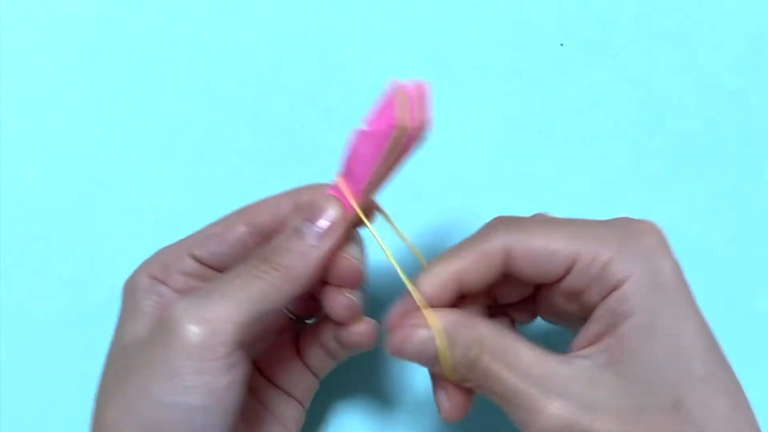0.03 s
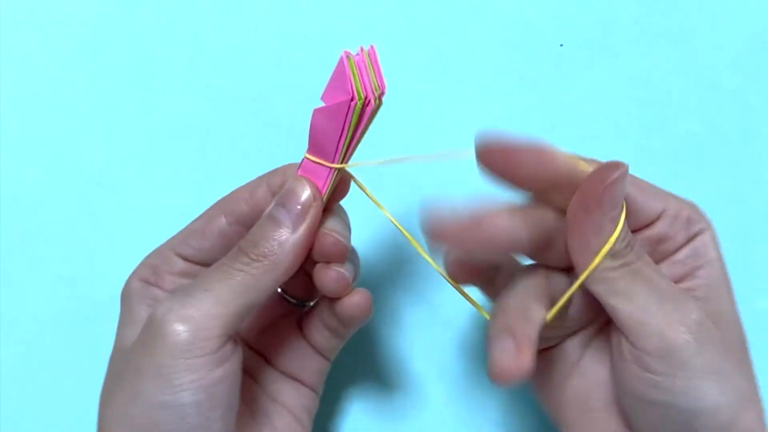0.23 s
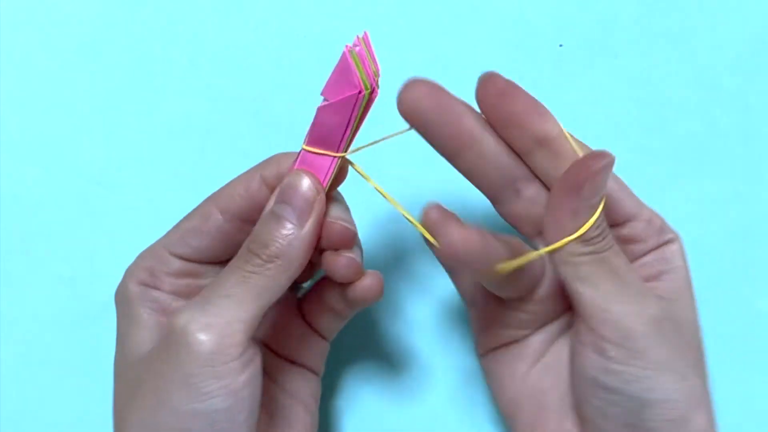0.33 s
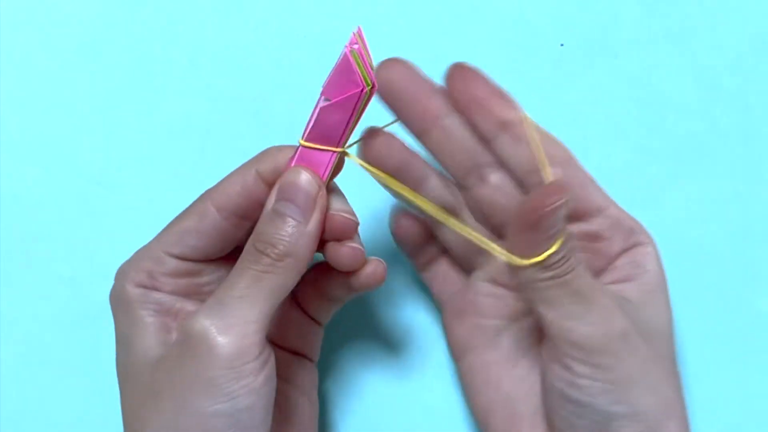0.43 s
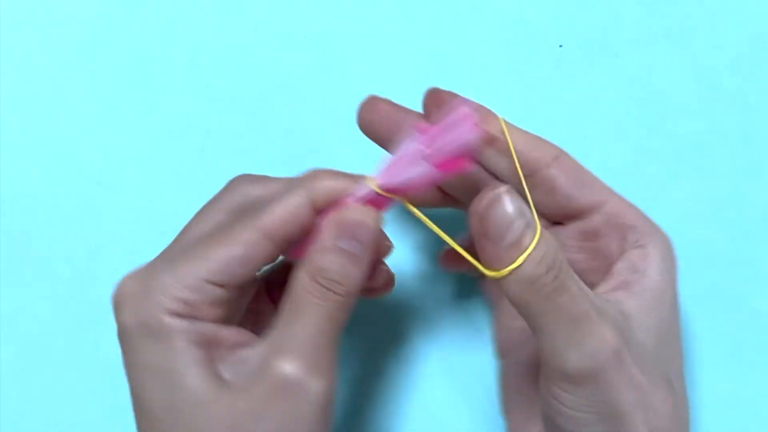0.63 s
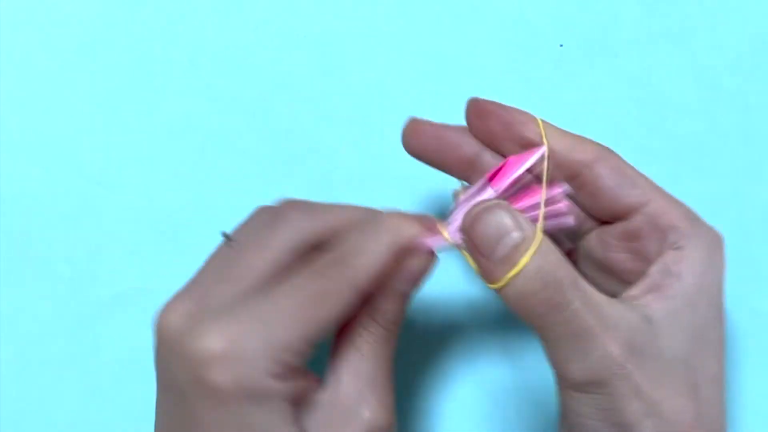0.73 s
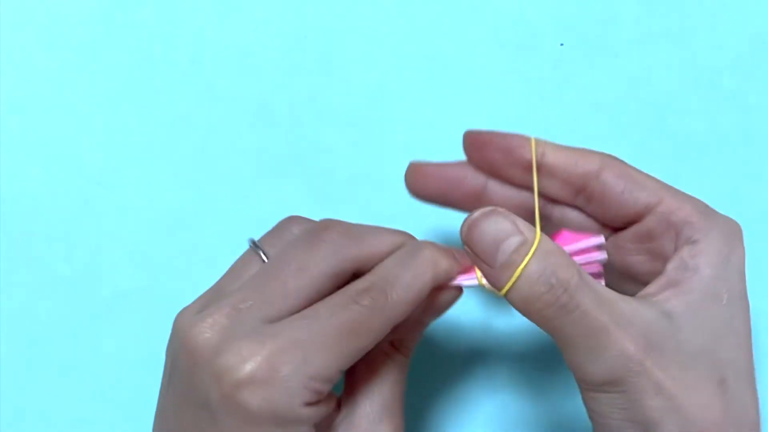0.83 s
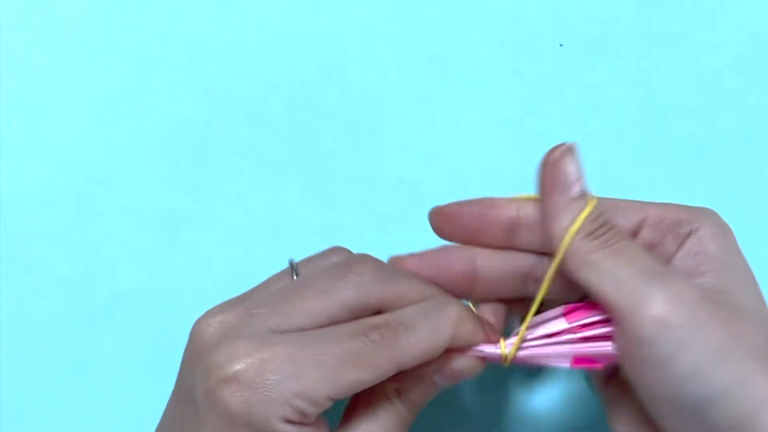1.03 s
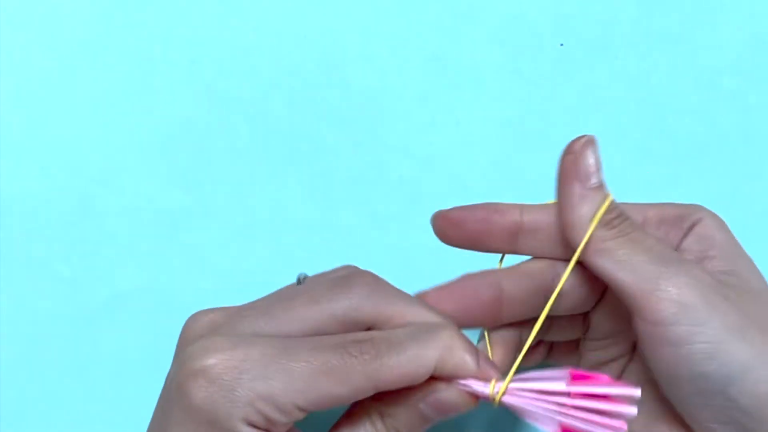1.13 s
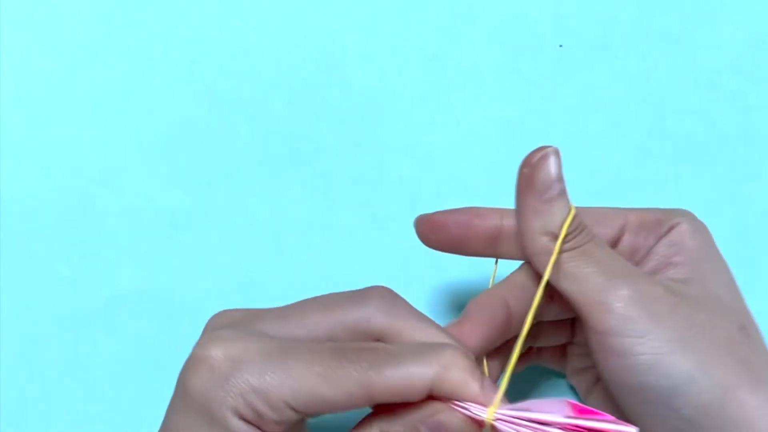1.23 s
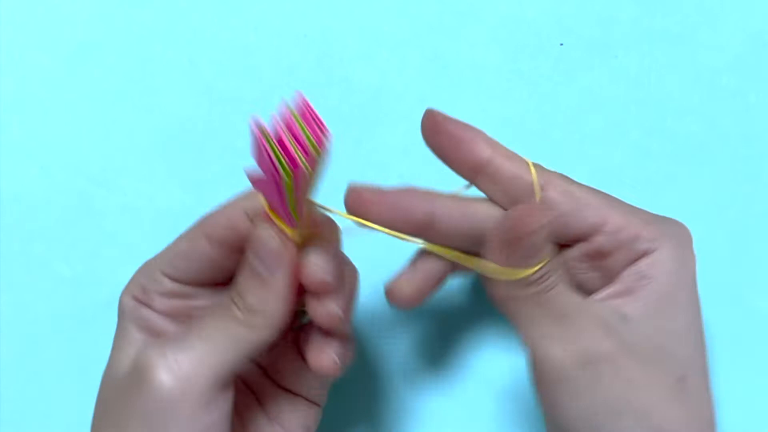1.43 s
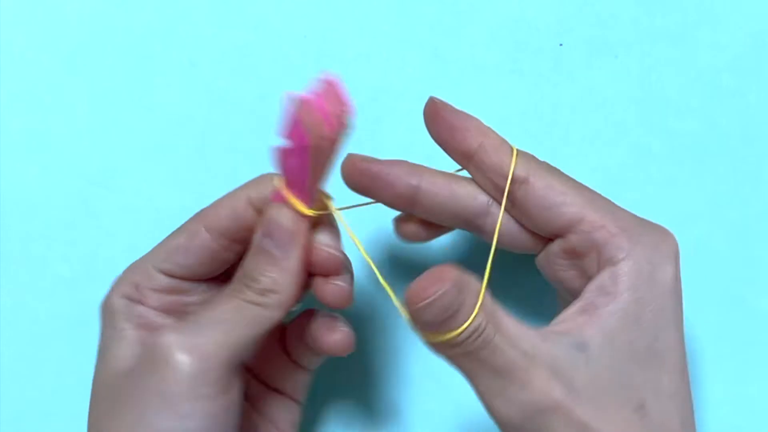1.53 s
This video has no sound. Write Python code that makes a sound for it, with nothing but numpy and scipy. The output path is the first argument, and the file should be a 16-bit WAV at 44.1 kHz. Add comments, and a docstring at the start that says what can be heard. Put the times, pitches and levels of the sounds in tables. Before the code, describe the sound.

A rubber band is wound around folded paper, close up in a small quiet room. Light finger taps and faint rustling come first, with a low flutter at 0.2 seconds. The band twangs off a finger at 0.45, then snaps sharply on the pleats several times around 0.7. A short crackly scrape ends in two clicks near 1.05, followed by faint ticks and soft hand rumble until 1.6.

```python
"""First come light finger taps and rustling paper, as a rubber band is wound around a folded paper fan.
The band flutters, is plucked off a finger, snaps sharply over the pleats and then scrapes along an edge.
Each snap makes the paper crack and ring; the scrape is thousands of tiny slips of rubber on paper.
The hands rumble softly. It all happens close to the microphone in a small quiet room."""
import sys
import numpy as np
from scipy import signal
from scipy.fft import rfft, irfft
from scipy.io import wavfile

SR = 44100
rng = np.random.default_rng(int(sys.argv[2]) if len(sys.argv) > 2 else 0)


def unload_audio(sound):
    """Save the sound as a 16-bit wav file, at the path given as the first command line argument."""
    columns = np.transpose(np.atleast_2d(sound))
    # keep every value between -1 and 1, then stretch to whole-number steps
    steps = np.round(np.clip(columns, -1, 1) * 32767)
    wavfile.write(sys.argv[1], SR, steps.astype(np.int16))


N = 70560

# The band hitting the pleats. Each row: start in seconds, level in dB, decay in seconds, edge pitch in Hz,
# then the dB added for each part: body knock, edge ring, edge buzz, crack, thump.
SNAPS = [(0.6827, -45.5, 0.009, 5200, -3.5, -11, 0.5, -5, -20.5),
         (0.6922, -23.5, 0.0019, 5280, -1.5, 0, 0.5, 0, -29.5),
         (0.7117, -21.5, 0.0022, 5050, 2.5, -4.5, 1.5, -8, -24),
         (0.7365, -35.5, 0.0032, 5200, -11.5, -9, -7, -6, -8.5),
         (0.7407, -20.5, 0.002, 5600, 0.5, -15.5, 0, 7.5, -9)]


def snaps():
    """The band hits a pleat with a crack and a thump; the fan knocks and its edge rings and buzzes."""
    # How the folded paper rings. Each row: pitch in Hz, width in Hz, level in dB.
    body_modes = [(565, 140, 4.5), (818, 66, 0.5), (1276, 260, 14.5), (1497, 160, 6)]
    # How its stiff edge rings. Each row: multiple of the edge pitch, width in Hz, level in dB.
    edge_modes = [(0.741, 380, -3), (.94, 380, -2), (0.999, 280, 5), (1.39, 600, -3.5)]
    # The tone of the buzz, crack and thump. Each row: frequency in Hz, level in dB.
    buzz_tone = [(300, -15), (1800, -14.5), (2500, -1.5), (3800, 5), (5200, -1.5), (6200, -12.5), (7500, 7),
                 (9500, 7.5), (11000, 5), (12500, 3), (16000, -4.5)]
    crack_tone = [(1000, -26), (6200, -12.5), (7500, 0), (9500, -1.5), (11500, -4.5), (13500, -2),
                  (15300, 1.5), (16500, -17)]
    thump_tone = [(60, -15), (130, -11.5), (250, 3), (400, -5), (650, -17.5), (820, 10), (1000, -2),
                  (3000, -30.5)]
    rise_s, body_lag_s = 0.00069, 0.00045
    out = np.zeros(N)
    for start, db, decay, edge_hz, *part_levels in SNAPS:
        modes = [(multiple * edge_hz, width, mode_db) for multiple, width, mode_db in edge_modes]
        push = burst(start + body_lag_s, decay / 2)
        knock = ring(push, body_modes)
        edge = ring(burst(start, decay / 2, rise_s), modes)
        buzz = colour(burst(start, decay, rise_s), buzz_tone)
        crack = colour(burst(start, decay=0.00034, rise=rise_s), crack_tone)
        thump = colour(push, thump_tone)
        for part_db, layer in zip(part_levels, (knock, edge, buzz, crack, thump)):
            out += sized(layer, db + part_db, decay)
    return out


def snap_spread():
    """What each snap throws out into the room, broader in tone than what faces the microphone."""
    # The tone sent into the room. Each row: frequency in Hz, level in dB.
    tone = [(100, -9.5), (250, 7.5), (700, -7), (1400, 7), (2500, 5), (4500, 1), (6200, 0), (9000, -2.5),
            (12000, -1.5), (16000, -12)]
    boost_db = 5
    return sum(sized(colour(burst(start, decay), tone), db + boost_db, decay)
               for start, db, decay, *_ in SNAPS)


def pluck(start=0.4435):
    """The loop slaps a finger and its two sides shudder; the high overtones die first."""
    # The two sides of the loop. Each row: pitch in Hz, stiffness, level in dB, decay in seconds,
    # change in overtone level in dB per octave.
    strands = [(69.4, 0.00014, -29, .06, -7.5), (40.69, .00004, -40, 0.062, 0)]
    # The tone of the loop. Each row: frequency in Hz, dB added to an overtone there.
    tone = [(40, -19.5), (68, -6), (137, 8), (175, -4.5), (215, 0), (290, -0.5), (350, -3.5), (410, 0),
            (520, -3), (750, -0.5), (1000, -4.5), (1400, -6), (1750, -13.5), (2100, -34.5)]
    sag, settle_s, rise_s = 0.031, 0.027, 0.003
    waver_depth, loss_per_khz, uneven_db = 0.0297, 5.7, 2.5
    age = np.maximum(clock() - start, 0)
    glide = (age > 0) * (1 - sag * np.exp(-age / settle_s))  # starts a little low in pitch
    out = np.zeros(N)
    for pitch, stiffness, db, decay, tilt_db in strands:
        for k, (first_turn, uneven) in enumerate(rng.standard_normal((48, 2)), 1):
            hz = k * pitch * np.sqrt(1 + stiffness * k ** 2)
            waver = 1 + waver_depth * wander(step_s=0.025)
            turns = np.cumsum(hz * glide * waver) / SR + first_turn
            loss = 1 / decay + loss_per_khz * hz / 1000
            gain = undb(db + at(hz, tone) + tilt_db * np.log2(k) + uneven_db * uneven)
            out += gain * np.exp(-age * loss) * np.sin(2 * np.pi * turns)
    return out * (1 - np.exp(-age / rise_s)) + slap(start)


def slap(start):
    """The strand lands on the finger: a dull smack and a very short note that falls in pitch."""
    # The tone of the smack. Each row: frequency in Hz, level in dB.
    tone = [(80, -16.5), (200, 0), (350, -7), (520, -1.5), (700, -7.5), (1000, -5.5), (1700, -14.5),
            (2300, -27), (5000, -40), (9000, -65)]
    note_hz, fall_s, note_s, smack_s = 590.4, 0.027, 0.0071, 0.0099
    age = np.maximum(clock() - start, 0)
    turns = note_hz * fall_s * (1 - np.exp(-age / fall_s))
    swell = np.sqrt(age / note_s) * np.exp(-(age / note_s) ** 2)
    smack = sized(colour(burst(start, smack_s), tone), db=-23.5, decay=smack_s)
    return smack + undb(-14.5) * swell * np.sin(2 * np.pi * turns)


def flutter(start=0.2115):
    """The slack strand swings slowly, starting high in pitch with a brief note an octave above."""
    pitch_hz, overshoot, settle_s = 51.44, 0.39, 0.018
    decay_s, octave_decay_s = 0.18, 0.024
    age = np.maximum(clock() - start, 0)
    hz = (age > 0) * pitch_hz * (1 + overshoot * np.exp(-age / settle_s))
    phase = 2 * np.pi * np.cumsum(hz) / SR
    low_note = np.exp(-age / decay_s) * np.sin(phase)
    octave = np.exp(-age / octave_decay_s) * np.sin(2 * phase)
    return undb(-34) * (low_note + octave)


def scrape():
    """The band crackles along the paper edge and jumps off it in two sharp clicks."""
    # How loud the dragging is. Each row: time in seconds, level in dB.
    levels = [(1.005, -77), (1.017, -52.5), (1.034, -44.5), (1.045, -40), (1.052, -32), (1.061, -36),
              (1.061, -45.5), (1.068, -81)]
    # The tone of rubber on the edge. Each row: frequency in Hz, level in dB.
    tone = [(200, -35), (550, -8), (900, 2), (1600, 0.5), (2300, 3.5), (2900, 6), (3800, -5), (5200, 2.5),
            (6300, -7), (8500, -4), (11000, -2), (15000, -2), (16500, -18.5)]
    # The jumps. Each row: start in seconds, level in dB, decay in seconds.
    jumps = [(1.0534, -23.5, .0028), (1.0582, -20, 0.0013)]
    clicks = sum(sized(colour(burst(start, decay), tone), db, decay) for start, db, decay in jumps)
    return friction(tone, levels, slips_per_s=5500) + clicks


def creaks():
    """Rubber squeaks on the paper: a short run of slips makes it ring at one pitch."""
    # Each row: start in seconds, level in dB, pitch in Hz, width in Hz, decay in seconds.
    squeaks = [(0.4247, -48, 3300, 501, 0.0037), (1.021, -43.5, 2400, 1100, 0.008),
               (1.148, -42, 2173, 220, 0.0041)]
    out = np.zeros(N)
    for start, db, hz, width, decay in squeaks:
        squeak = ring(burst(start, decay), [(hz, width, 0)])
        out += sized(ring(squeak, [(hz, 2 * width, 0)]), db, decay)
    return out


def twangs():
    """The strand slips over a finger and swings with soft low notes."""
    # Each row: start in seconds, level in dB, pitch in Hz, decay in seconds.
    notes = [(.064, -43, 213.6, 0.036), (.135, -48.5, 140.3, 0.034), (.15, -46, 208.2, 0.069),
             (0.74, -42.5, 130.4, 0.026), (1.09, -38.5, 109.8, 0.005), (1.141, -42.5, 73.9, 0.028)]
    # The two tones in each note. Each row: multiple of the pitch, dB added.
    partials = [(1, 2), (2.65, -10.5)]
    out = np.zeros(N)
    for start, db, hz, decay in notes:
        age = np.maximum(clock() - start, 0)
        for multiple, part_db in partials:
            phase = 2 * np.pi * hz * multiple * age
            soft_start = 1 - np.exp(-phase)
            out += undb(db + part_db) * soft_start * np.exp(-age / decay) * np.sin(phase)
    return out


def taps():
    """Fingers touch the fan: the fingertip thuds, and the paper ticks and hisses."""
    # Each row: start in seconds, level in dB, decay in seconds, then dB added for thud, tick and hiss.
    touches = [(0.0612, -44.5, 0.011, 2, -9.5, -27.5), (.129, -47.5, 0.027, 3, -10, -23),
               (.157, -48.5, 0.0082, 7, 2, -5), (0.443, -42.5, 0.0018, -24, 0.5, 1.5),
               (1.146, -51, 0.0046, -20, 1, 1), (1.1907, -50.5, 0.0021, -15, -11, 6.5)]
    # The tone of those three parts. Each row: frequency in Hz, level in dB.
    thud_tone = [(60, -10), (130, -2), (220, 3.5), (400, -15), (750, -3.5), (1100, -18), (1600, -8),
                 (3500, -54)]
    tick_tone = [(400, -19.5), (1400, -10), (2100, -1.5), (2600, -8.5), (3600, -13.5), (9000, -28.5),
                 (16000, -36.5)]
    hiss_tone = [(1000, -18), (3500, -10.5), (5500, -9.5), (9000, -6.5), (12000, -11), (15000, -12.5)]
    out = np.zeros(N)
    for start, db, decay, *part_levels in touches:
        touch = burst(start, decay)
        for part_db, tone in zip(part_levels, (thud_tone, tick_tone, hiss_tone)):
            out += sized(colour(touch, tone), db + part_db, decay)
    return out


def rustle():
    """The band and fingers rub faintly over the paper."""
    # How loud the rubbing is. Each row: time in seconds, level in dB.
    levels = [(0, -66), (.12, -69.5), (.18, -61.5), (.27, -59), (.38, -64.5), (0.431, -59.5), (.5, -76.5),
              (.62, -87.5), (0.681, -67.5), (.95, -85.5), (1.13, -77), (1.22, -86), (1.321, -79),
              (1.6, -88)]
    # Its tone. Each row: frequency in Hz, level in dB.
    tone = [(300, 8), (1000, 4.5), (2200, 1), (4000, -3), (6500, -10.5), (9000, -7.5), (12000, -15),
            (15000, -12)]
    return friction(tone, levels, slips_per_s=9800)


def hands():
    """The hands rumble, and fingertips sliding on the paper make a very high whisper."""
    # How loud each sound is. Each row: time in seconds, level in dB.
    rumble_levels = [(0, -47.5), (.1, -51.5), (.19, -46.5), (.3, -50.5), (.6, -55.5), (.8, -54), (.88, -54),
                     (.97, -66), (1.07, -54), (1.16, -54), (1.23, -63.5), (1.3, -68), (1.37, -56.5),
                     (1.6, -68)]
    whisper_levels = [(0, -92), (.38, -86.5), (.425, -60), (.47, -87), (.63, -68), (.7, -76), (1.15, -79),
                      (1.25, -68), (1.36, -77.5), (1.6, -88)]
    # The tone of each. Each row: frequency in Hz, level in dB.
    rumble_tone = [(20, -31), (45, -5.5), (68, -0.5), (95, -5.5), (130, -1), (190, -17.5), (300, -23),
                   (1000, -54)]
    whisper_tone = [(8000, -21.5), (12000, -7), (14500, 5), (16000, -5.5)]
    rumble = unit(colour(noise(), rumble_tone)) * curve(rumble_levels)
    whisper = unit(colour(noise(), whisper_tone)) * curve(whisper_levels)
    return rumble + whisper


def room_echo(x):
    """The walls return a short wash of sound in which each octave fades at its own speed."""
    # How long the echo lasts. Each row: frequency in Hz, seconds to fade by 60 dB.
    fade_times = [(150, 0.49), (600, 0.2541), (1500, 0.2948), (5000, 0.35), (10000, 0.33), (15000, 0.17)]
    # The tone of the echo. Each row: frequency in Hz, level in dB.
    tone = [(100, -11), (500, -9.5), (1400, -8), (3000, -10.5), (5500, -8), (9000, -9), (14000, -12)]
    rise_s = 0.0014
    t, tail = clock(), 0
    walls = rfft(diffuse_noise(), 2 * N)
    centres_hz = 125 * 2. ** np.arange(8)
    for hz, pick in zip(centres_hz, np.eye(len(centres_hz))):
        octave = irfft(walls * at(bins(), list(zip(centres_hz, pick))))[:, :N]
        loss = np.log(1000) / at(hz, fade_times)
        tail += octave * np.exp(-loss * t) * np.sqrt(2 * loss / SR)  # same energy for any fade time
    tail = colour(tail * (1 - np.exp(-t / rise_s)), tone)
    return signal.fftconvolve(x[None], tail, axes=1)[:, :N]


def room_air():
    """The faint, steady, low hush of the room."""
    # The tone of the hush. Each row: frequency in Hz, level in dB.
    tone = [(20, 1), (60, 6), (150, 2.5), (300, -5), (600, -8.5), (1200, -20), (2500, -28), (5000, -28),
            (9000, -33.5), (12000, -33), (15000, -25.5), (17000, -35)]
    return undb(-62.5) * unit(colour(diffuse_noise(), tone))


def diffuse_noise():
    """Stereo noise that seems to arrive from all round."""
    # Stereo width. Each row: frequency in Hz, dB of the side signal against the middle one.
    width = [(60, -14), (150, -12.5), (300, -3), (600, 1.5), (3000, -1.5), (6000, -0.5), (9000, -15.5),
             (12000, -17)]
    mid, side = noise(), colour(noise(), width)
    return np.array([mid + side, mid - side])


def friction(tone, levels, slips_per_s):
    """Rubbing surfaces stick and slip, making dense clicks of uneven size over a little hiss."""
    slips = (rng.random(N) < slips_per_s / SR) * noise()
    return unit(colour(slips + 0.083 * noise(), tone)) * curve(levels)


def burst(start, decay, rise=0, size=4096):
    """A dying shower of tiny slips, about equally strong at all frequencies."""
    age = np.arange(size) / SR
    envelope = (1 - np.exp(-age / (rise + 1 / SR))) * np.exp(-age / decay)
    spectrum = rfft(rng.standard_normal(size) * envelope)
    even = irfft(spectrum / (np.abs(spectrum) + 1e-12))
    out, first = np.zeros(N), int(start * SR)
    out[first:first + size] = even * envelope ** .25
    return out


def ring(x, modes):
    """Make a sound ring. Each row of modes: pitch in Hz, width in Hz, level in dB."""
    return sum(undb(db) * signal.lfilter(*signal.iirpeak(hz, hz / width, SR), x)
               for hz, width, db in modes)


def colour(x, tone, size=8192):
    """Filter a sound to the given tone, with nothing heard ahead of its start."""
    half = size // 2
    gains = undb(at(np.arange(half + 1) * SR / size, tone))
    cepstrum = irfft(np.log(gains))
    # Folding onto the first half makes the filter respond only after its input.
    cepstrum[1:half] *= 2
    cepstrum[half + 1:] = 0
    response = irfft(np.exp(rfft(cepstrum)))
    return signal.oaconvolve(x, response.reshape((1,) * (x.ndim - 1) + (-1,)), axes=-1)[..., :N]


def sized(x, db, decay):
    """Give a hit the energy of a fading sound that starts at the given level."""
    return x * undb(db) * np.sqrt(decay * SR / 2 / np.sum(x ** 2))


def wander(step_s):
    """A random drift, roughly between -1 and 1."""
    points = rng.standard_normal(400)
    return np.interp(clock() / step_s, np.arange(len(points)), points)


def curve(levels):
    """Gain over time, from rows of seconds and dB."""
    return undb(np.interp(clock(), *np.array(levels).T))


def at(hz, table):
    """Look up a frequency in a table, blending between rows on a log scale."""
    rows = np.array(table, float)
    return np.interp(np.log(np.maximum(hz, 1)), np.log(rows[:, 0]), rows[:, 1])


def undb(db):
    """Turn decibels into gain."""
    return 10 ** (np.asarray(db) / 20)


def unit(x):
    """Scale to an average (rms) level of 1."""
    return x / np.sqrt(np.mean(x ** 2))


def clock():
    """The time of each sample in seconds."""
    return np.arange(N) / SR


def bins():
    """The frequencies in Hz of a spectrum of 2 * N samples."""
    return np.arange(N + 1) * SR / (2 * N)


def noise():
    """White noise."""
    return rng.standard_normal(N)


def scene():
    """Band, paper and hands in the room; the flutter and the background get no echo."""
    handling = scrape() + creaks() + rustle() + taps() + pluck() + twangs()
    cracks = snaps()
    into_room = handling + undb(-3) * cracks + snap_spread()
    background = hands() + room_air()
    return cracks + handling + flutter() + room_echo(into_room) + background


def record(dry):
    """Two close microphone openings differ in timing and level; deep bass and top treble are cut."""
    # The timing gap. Each row: frequency in Hz, radians by which the left side leads.
    left_lead = [(20, 0), (1700, 0.38), (2500, 0.5), (5000, 0.84), (6000, 2), (7700, -3), (9200, -2.5),
                 (11000, -5.3), (12500, -5.8), (16000, -6.4)]
    # The level gap. Each row: frequency in Hz, left minus right in dB.
    balance = [(60, 1.5), (1400, 1.5), (2800, 2), (5000, 3.5), (7500, 3.5), (9500, -1.5), (13000, 0)]
    low_cut_hz, top_hz = 35, 16400
    left = undb(at(bins(), balance) / 2)
    right = np.exp(-1j * at(bins(), left_lead)) / left
    heard = irfft(rfft(dry, 2 * N) * np.array([left, right]))[:, :N]
    heard = signal.sosfilt(signal.butter(2, low_cut_hz, "high", fs=SR, output="sos"), heard)
    return signal.sosfilt(signal.ellip(8, .2, 70, top_hz, fs=SR, output="sos"), heard)


dry = scene()
out = record(dry)
unload_audio(out)
```